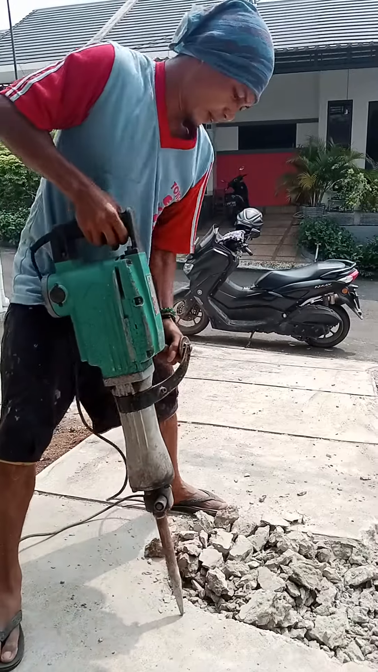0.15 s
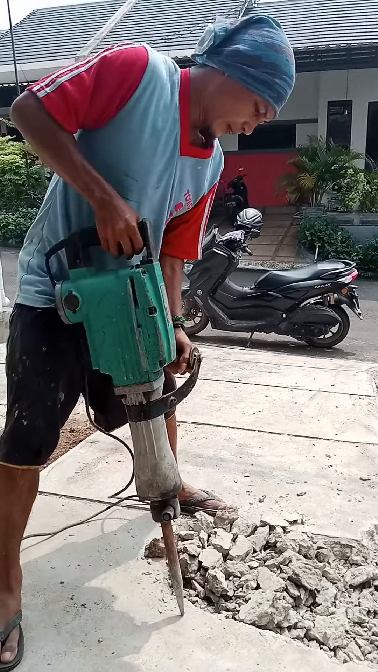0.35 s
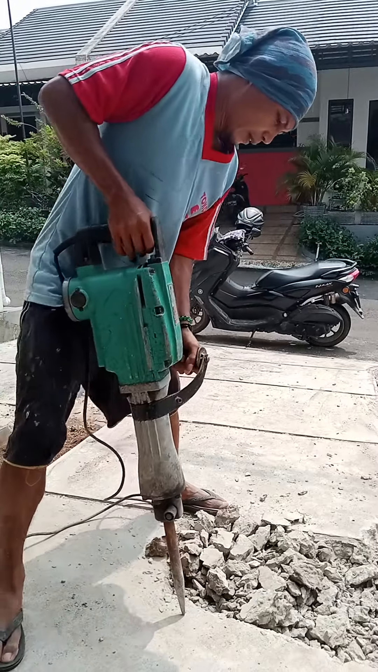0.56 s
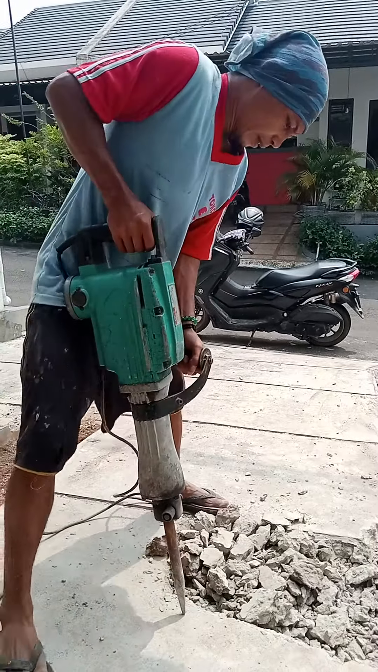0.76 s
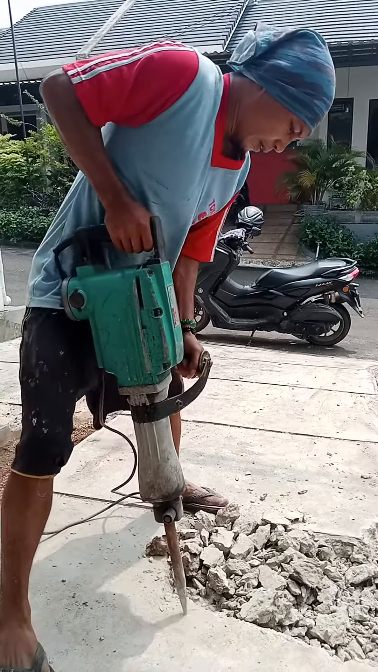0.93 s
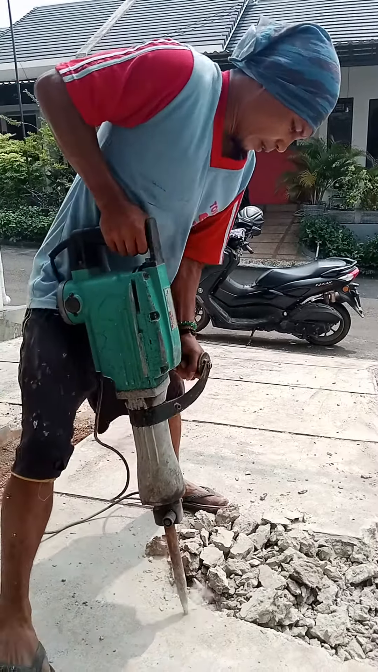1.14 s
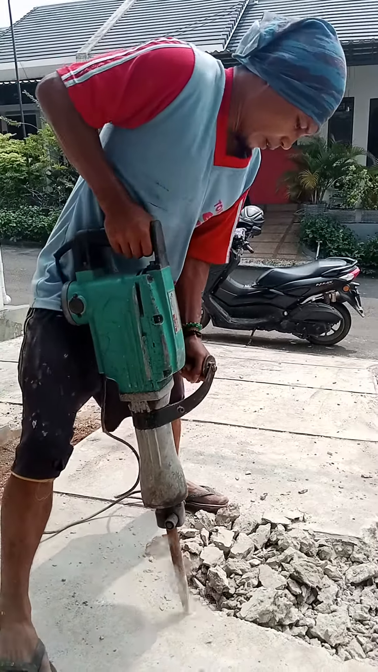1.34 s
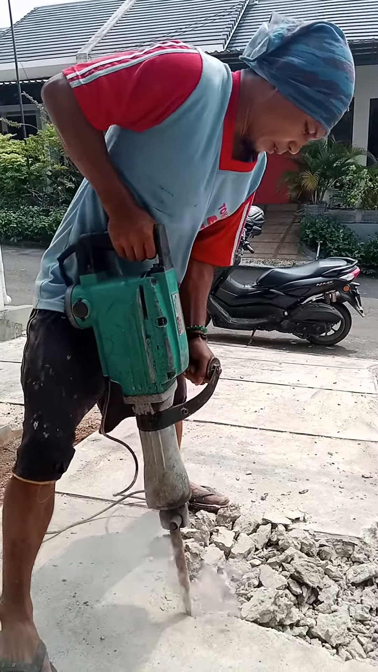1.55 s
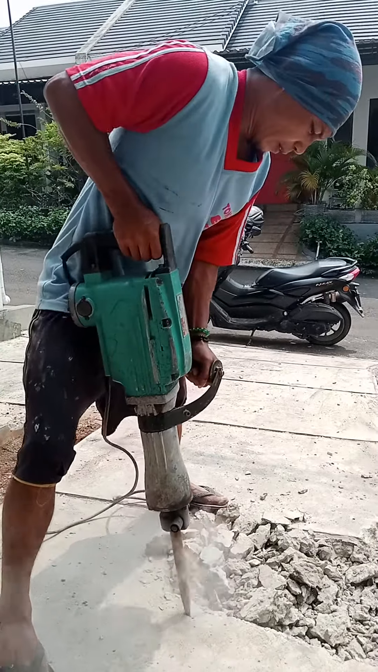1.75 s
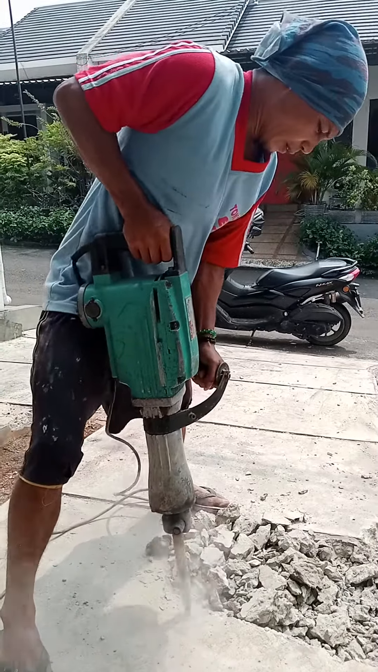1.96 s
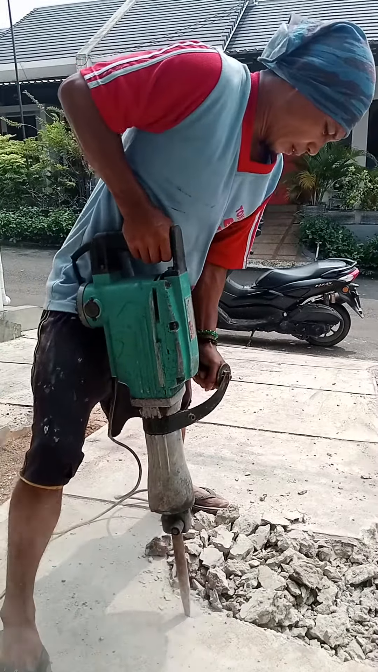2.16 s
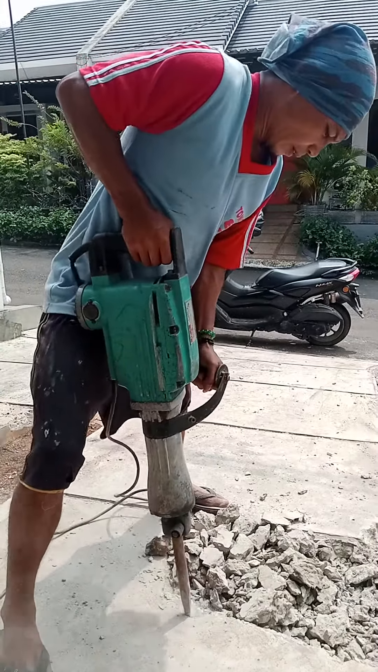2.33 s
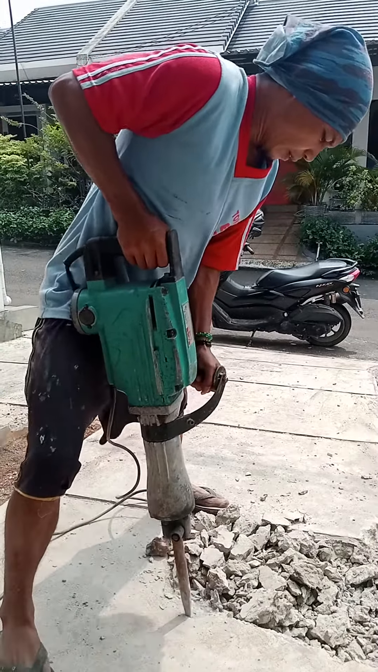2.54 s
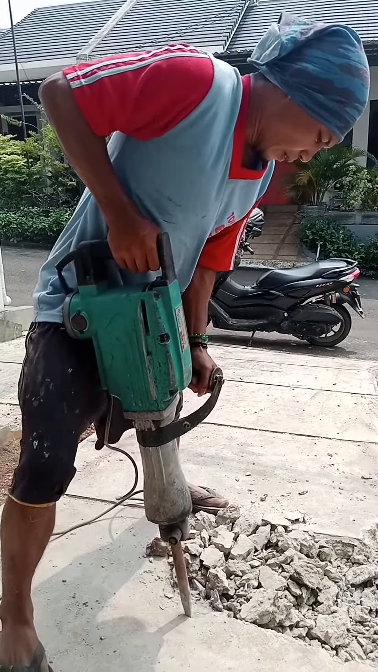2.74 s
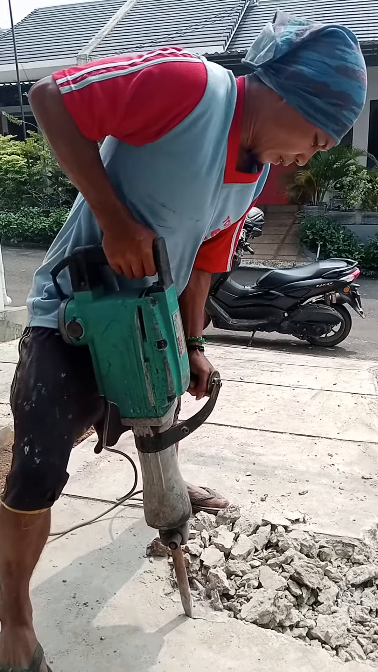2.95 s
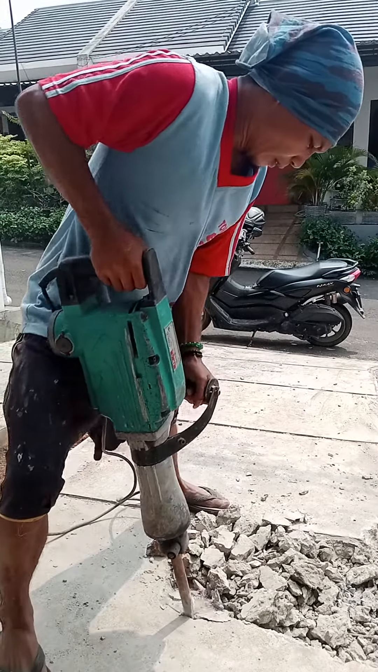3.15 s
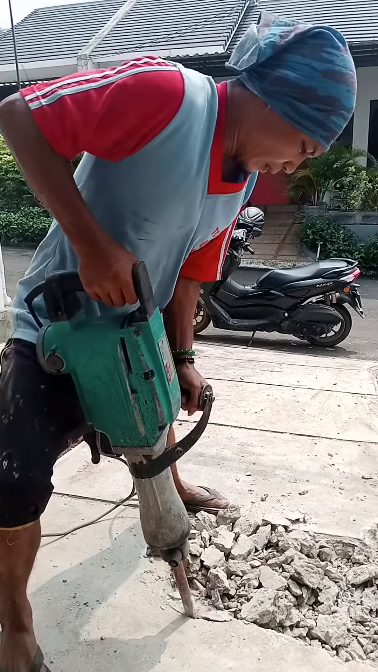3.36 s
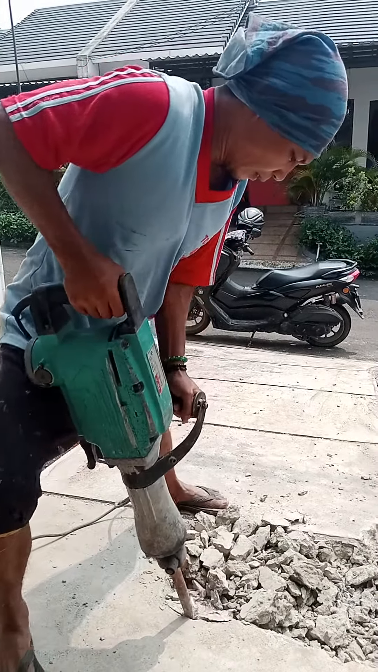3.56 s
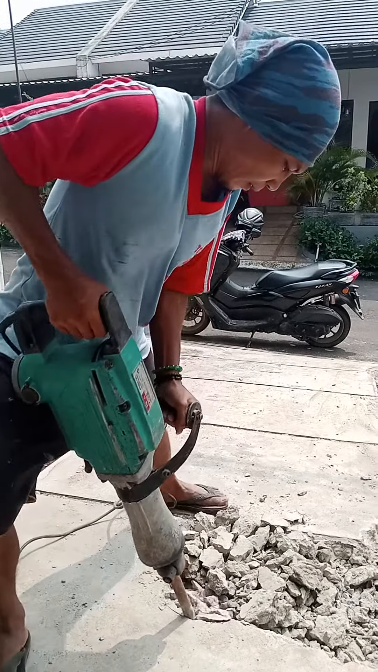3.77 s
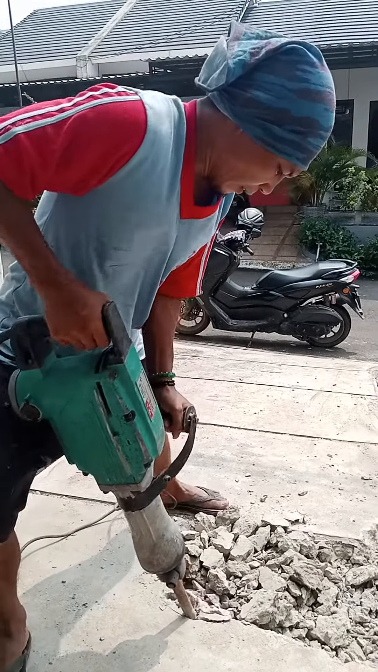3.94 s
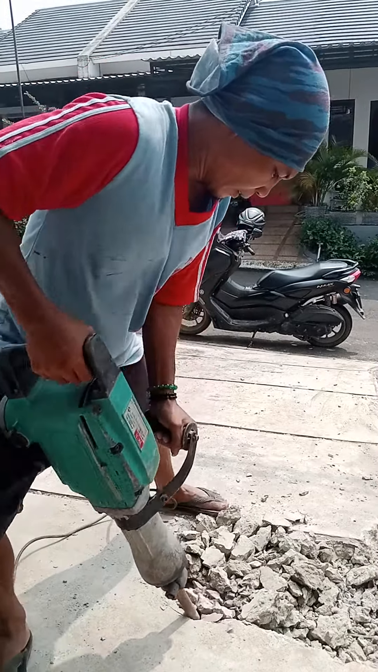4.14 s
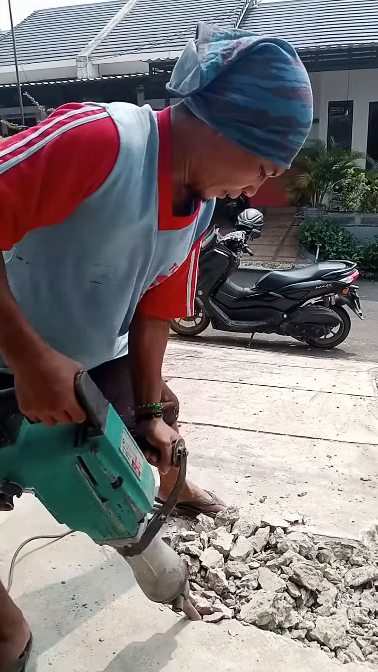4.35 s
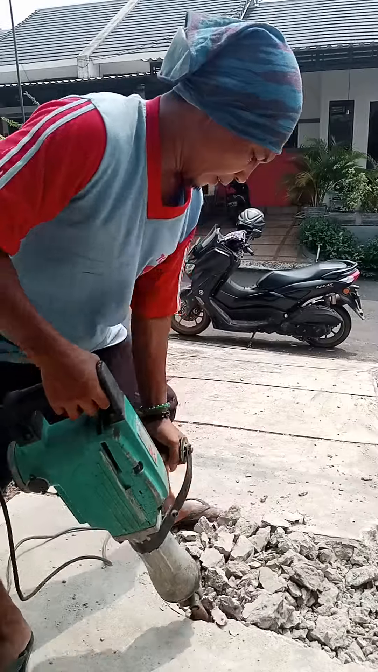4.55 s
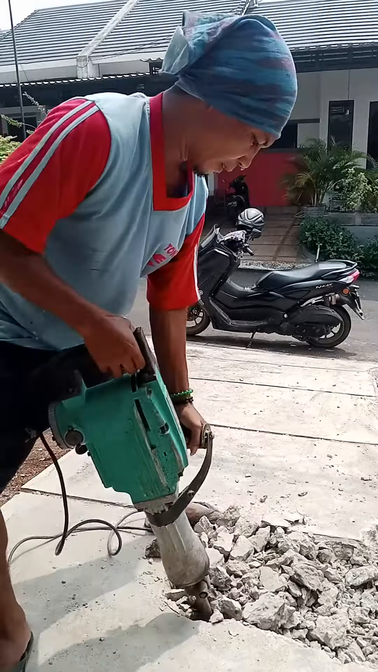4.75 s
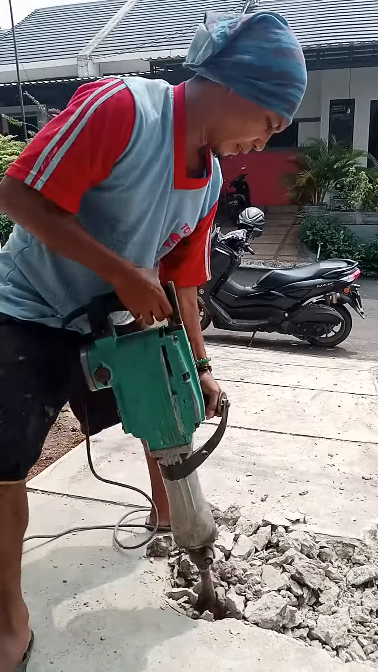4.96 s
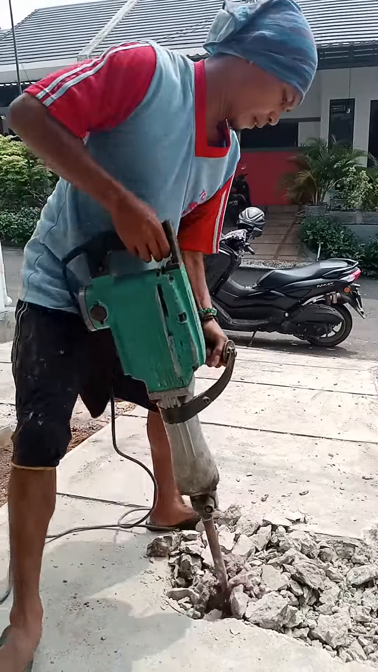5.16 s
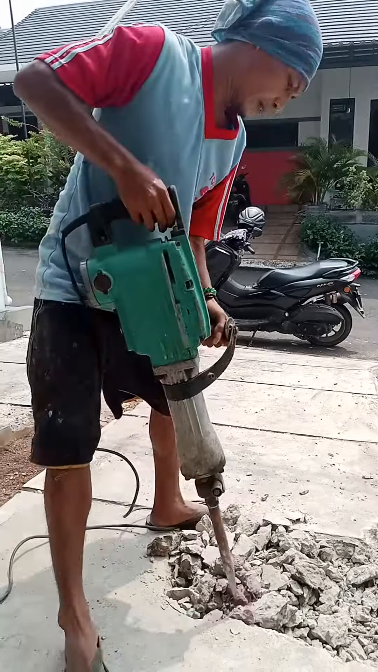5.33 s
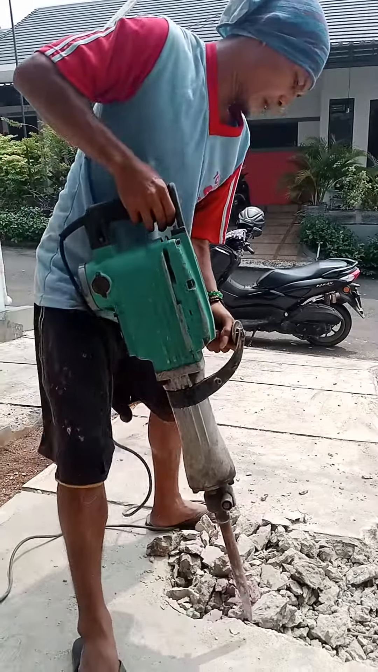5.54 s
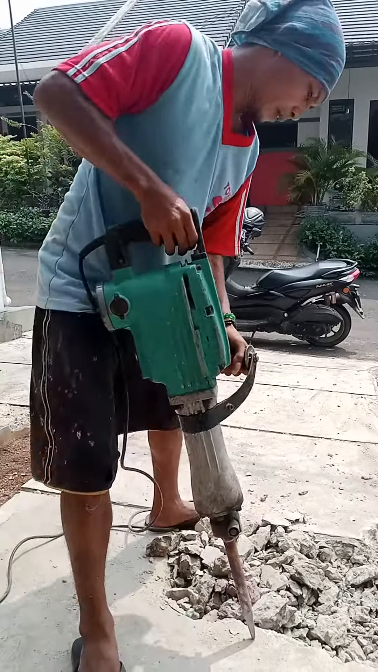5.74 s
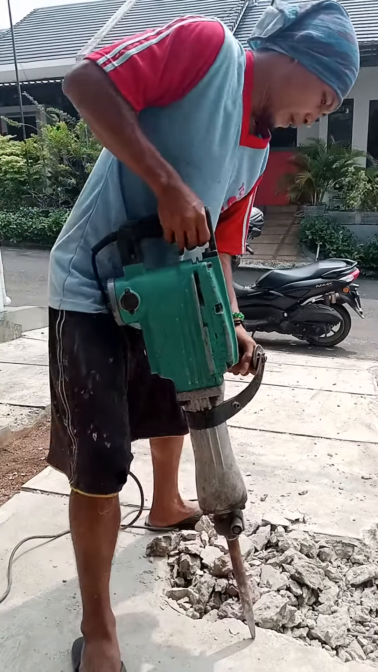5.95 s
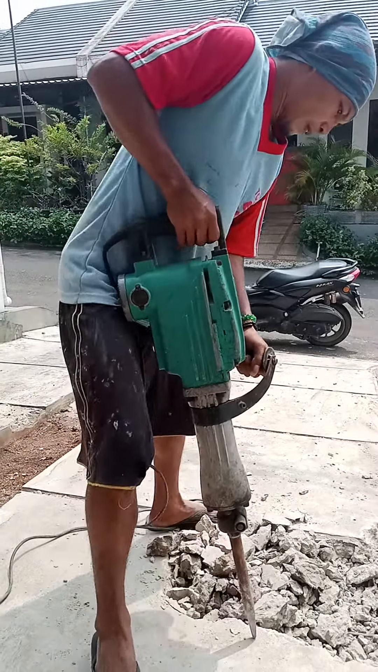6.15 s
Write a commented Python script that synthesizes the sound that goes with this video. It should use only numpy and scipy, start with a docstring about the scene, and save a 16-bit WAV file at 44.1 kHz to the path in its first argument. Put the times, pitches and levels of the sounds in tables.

```python
"""An electric demolition hammer pounds a concrete slab about 23 times a second, outdoors near a phone.
It is set down first, and afterwards levered out and set down again. Each blow is a blunt knock with slab modes,
a noise burst of cracking grit and dying steel modes of the chisel, choked when the tip presses on concrete again.
Between blows run coloured noise (rattle, hiss, rumble) and fuzzy gear and armature whines; drops of the tool
make the slab boom, fuzzy tones sing in the handled tool, and sparse echoes answer the blows."""
import sys
import numpy as np
from scipy import signal
from scipy.fft import rfft, irfft
from scipy.io import wavfile
from scipy.ndimage import uniform_filter1d

SR = 44100
rng = np.random.default_rng(int(sys.argv[2]) if len(sys.argv) > 2 else 0)


def bounce(signal):
    """Save signal as a 16-bit WAV file at the path given by the first command-line argument."""
    frames = np.transpose(np.atleast_2d(signal))
    limited = np.clip(frames, -1, 1)
    pcm = np.round(limited * 32767).astype(np.int16)
    wavfile.write(sys.argv[1], SR, pcm)


def elevation(decibels):
    """Turn decibel levels (scalar or array-like) into linear amplitude ratios."""
    levels = np.asarray(decibels, float)
    return 10 ** (levels / 20)


N = 277830

SHANK_HZ = 12500
RING_DB = -14.5  # chisel ring of a bare tip, before the trim in chisel()

# Work of the hammer: (time [s], knock pitch [Hz], tip depth [0-1], knock level [dB], motor effort [dB], load [0-1])
WORK_POINTS = [(0.751, 650, 0.37, -13, 3.5, 0.4), (1.102, 673, 0.18, -6.5, 0, 0.79),
               (1.603, 780, 0.02, -6, 2.5, 0.5), (2, 810, 0.03, -4, 3.5, 0.69),
               (2.65, 763, 0.31, -3, -1, 1), (2.85, 685, 0.63, -6.5, -0.5, 1),
               (3.08, 640, 0.46, -8.5, 1, 0.85), (3.199, 640, 0.29, -13, 3, 0.68),
               (3.598, 644, 0.34, -13, 2, 0.73), (4.15, 550, 0.41, -21.5, 6, 0.49),
               (4.35, 547, 0, -56, 4, 0), (4.5, 676, 0.12, -16, -1.5, 0.19), (4.9, 663, 0.3, -46, -5, 0.26)]
# Piston speed from run-up to run-down: (time [s], rate [blows per s])
PISTON_SPEED = [(.87, 17.05), (1.08, 22.49), (1.37, 21.78), (1.56, 23.46), (1.69, 22.45), (2.56, 22.92),
                (2.85, 23.87), (2.94, 24.91), (3.31, 25.75), (3.7, 25.17), (4.19, 26.97), (4.26, 24.27),
                (4.37, 25.98), (4.6, 14.92), (4.9, 6.8)]
# Tool's weight dropping on the slab: (time [s], boom level [dB], housing clank level [dB])
TOOL_DROPS = [(0.154, -27.5, -37), (0.247, -20.5, -29), (0.3337, -12, -26), (0.424, -21, -21),
              (0.519, -17, -28), (0.787, -23, -18), (5.736, -21.5, -33), (5.764, -20, -13),
              (6.29, -11.5, -15.5)]
# Ringing modes of the tool housing: (frequency [Hz], level [dB], t60 [s])
HOUSING_MODES = [(1173, -11, 0.21), (2300, -30.5, 0.21), (2840, -12, 0.053), (3170, -16.5, 0.2),
                 (3560, -29.5, .22), (4900, -28, 0.33), (5260, -11.5, 0.15)]


def read(points, hz):
    """Value of a spectrum on a log-frequency axis."""
    f, value = np.transpose(points)
    return np.interp(np.log(hz + 1), np.log(f + 1), value)


def evened(x):
    """Scales to rms 1."""
    return x / np.sqrt(np.mean(x ** 2) + 1e-20)


def smooth_noise(size):
    """Slow random curve of rms 1: a moving average of white noise."""
    return evened(uniform_filter1d(rng.standard_normal(N), size))


def smooth_patches(shape, bins, frames):
    """Random time-frequency patches of rms 1."""
    across = uniform_filter1d(rng.standard_normal(shape), bins, axis=0)
    return evened(uniform_filter1d(across, frames, axis=1))


def coloured(x, points):
    """Gives x the colour of a spectrum."""
    gain = elevation(read(points, np.fft.rfftfreq(len(x), 1 / SR)))
    return irfft(rfft(x) * gain, len(x))


def ring(modes, t, phase_turns):
    """Sum of dying sines."""
    hz, db, t60_s = np.transpose(modes)[:, :, None]
    sines = np.sin(2 * np.pi * (hz * t + phase_turns))
    return (elevation(db - 60 * t / t60_s) * sines).sum(0)


def whine(hz, width_hz):
    """A fuzzy whistle of rms 1: slow noise shifted up to a moving pitch."""
    r = np.exp(-np.pi * width_hz / SR)
    noise = rng.standard_normal(N) + 1j * rng.standard_normal(N)
    slow = signal.lfilter([1], [1, -2 * r, r * r], noise)
    carrier = np.exp(2j * np.pi * np.cumsum(hz) / SR)
    return evened((slow * carrier).real)


def patchy(points, patchy_db, grain_db):
    """Grainy noise of rms 1 whose colour flickers in small patches."""
    grain_gain = elevation(grain_db * np.minimum(rng.exponential(1, N), 4))
    grains = grain_gain * rng.standard_normal(N)
    z = signal.stft(coloured(grains, points), nperseg=256)[2]
    patches = smooth_patches(z.shape, 4, 8)
    flicker = evened(uniform_filter1d(rng.standard_normal(z.shape[1]), 5))
    z = z * elevation(patchy_db * patches + 1.7 * flicker)
    return evened(signal.istft(z, nperseg=256)[1][:N])


def train(blows, gain, lead_s=0):
    """One click at every blow, lead_s ahead of it."""
    clicks = np.zeros(N)
    clicks[np.round((blows[:, 0] - lead_s) * SR).astype(int)] = gain
    return clicks


def swell(start_s, length_s, rise_s, fade_db_per_s):
    """Rises, holds and fades."""
    t = np.arange(N) / SR - start_s
    return np.clip(t / rise_s, 0, 1) * elevation(-fade_db_per_s * np.maximum(t - length_s, 0))


def all_blows():
    """Piston blows on whole turns, weaker for a buried tip, merged with bumps: rows (s, crack, knock, ring dB)."""
    # Tip bumping concrete or rubble in handling: (time [s], crack level [dB], knock level [dB], ring level [dB])
    bumps = [(0.012, -19.5, -53, -52), (0.157, -52, -15, -61), (0.1914, -41, -29, -50),
             (0.222, -18, -40, -62), (0.2483, -16, -10, -14.5), (0.335, -21.5, -16, -38),
             (0.4271, -15.5, -11.5, -30), (0.441, -15, -12.5, -40), (0.482, -23, -25, -53),
             (0.525, -22.5, -25, -64), (0.533, -43, -48, -64), (0.608, -33.5, -42, -64),
             (.658, -44, -54, -64), (0.768, -12, -26, -51), (0.789, -17, -10, -38), (0.821, -16, -25, -52),
             (4.5858, -14.5, -48, -45), (4.6565, -16.5, -22.5, -36), (4.799, -28, -32, -38),
             (4.9498, -14.5, -35, -50), (4.974, -29, -47, -51), (4.993, -17, -46, -56),
             (5.0284, -14.5, -33, -52), (5.06, -43, -46, -58), (5.182, -29, -28, -63),
             (5.336, -39, -53, -44), (5.695, -53, -77, -68), (5.7183, -34, -53, -63),
             (5.7425, -32, -12, -35), (5.765, -20, -19, -42), (5.822, -32, -47, -63),
             (5.838, -44, -53, -64), (6.121, -54, -74, -53), (6.155, -53, -63, -64),
             (6.206, -15.5, -44, -58), (6.235, -14.5, -30, -56), (6.273, -25, -38, -55),
             (6.2915, -17, -20, -46)]
    # Blows that stand out: (time [s], crack level [dB], ring level [dB])
    marked = [(.87, -7, -33.5), (.93, -15.5, -11.5), (1.03, -13, -17), (1.07, -10, -16.5), (1.12, -7, -13),
              (1.21, -5, -14), (1.3, -4.5, -14), (1.34, -12, -14), (1.48, -16, -11.5), (1.57, -4, -13),
              (1.61, -9, -11), (1.65, -6.5, -9.5), (1.7, -5.5, -14.5), (1.83, -6.5, -14),
              (1.875, -3.5, -38.5), (1.92, -3, -14), (2.01, -2, -11), (2.23, -7.5, -13.5),
              (2.36, -6, -19.5), (2.58, -9, -21), (4.4, -6, -23), (4.445, -4.5, -40), (4.545, -6, -43),
              (4.765, -15, -20.5), (4.88, -12, -39)]
    # The slab gives way: start and end [s]
    broken_s = (2.9, 3.3)
    crack_db, crack_buried_db, crack_spread_db = -6.5, -13, -0.5  # bare tip, change when buried, chance
    ring_buried_db, ring_spread_db = -37, 3
    ring_broken_db, ring_unloaded_db = -12, -6  # rubble damps the chisel
    knock_spread_db, loose_spread_db = 0.8, 2.5  # chance on firm concrete, added once broken
    jitter_s = 0.0003

    t = np.arange(PISTON_SPEED[0][0], PISTON_SPEED[-1][0], 1 / SR)
    turns = np.cumsum(np.interp(t, *np.transpose(PISTON_SPEED))) / SR
    s = np.interp(np.arange(int(turns[-1]) + 1), turns, t)
    late, hard, firm, free = rng.standard_normal((len(s), 4)).T
    at, _, depth, knock_db, _, load = np.transpose(WORK_POINTS)
    buried = np.clip(np.interp(s, at, depth), 0, 1)
    broken = np.interp(s, broken_s, (0, 1))
    unloaded = 1 - np.interp(s, at, load)

    cracks_db = crack_db + crack_buried_db * buried + crack_spread_db * hard
    spread_db = knock_spread_db + loose_spread_db * broken
    knocks_db = np.interp(s, at, knock_db) + spread_db * np.clip(firm, -2, 1)
    rings_db = RING_DB + ring_buried_db * buried + ring_spread_db * free
    rings_db = rings_db + ring_broken_db * broken + ring_unloaded_db * unloaded ** 2
    rows = np.transpose([s + jitter_s * late, cracks_db, knocks_db, rings_db])
    for marked_s, *levels_db in marked:
        rows[np.argmin(abs(s - marked_s)), 1::2] = levels_db
    rows = np.vstack([rows, bumps])
    return rows[np.argsort(rows[:, 0])]


def loudness():
    """Gains of rattle, hiss and rumble: the motor, the scrapes and the drops add up in power."""
    # Floor that never stops: rattle, hiss, rumble levels [dB]
    still_db = [-81, -79.5, -66.5]
    # Tool dragged or levered through grit:
    # (start [s], rise [s], length from start to fade [s], housing rattle level [dB], grit hiss level [dB])
    scrapes = [(-.03, 0.068, 0.054, -28.5, -31.5), (0.056, 0.0052, 0.084, -29, -31),
               (0.168, 0.0071, 0.035, -30, -32.5), (0.28, 0.0072, 0.11, -33.5, -36.5),
               (0.425, 0.0057, 0.1, -33.5, -41), (0.553, 0.0043, 0.089, -47.5, -51),
               (0.675, 0.0046, 0.045, -42, -41.5), (4.637, .015, 0.12, -36, -34),
               (4.796, 0.0098, 0.051, -31, -34), (4.901, 0.04, 0.18, -32.5, -36),
               (5.093, 0.036, 0.045, -31, -32), (5.173, 0.004, 0.12, -38, -42.5),
               (5.332, .005, 0.049, -37, -37), (5.537, 0.15, 0.37, -62, -62.5),
               (5.759, 0.0037, 0.014, -32, -39), (6.044, 0.17, .14, -64, -64),
               (6.143, 0.039, .06, -47.5, -45.5), (6.181, 0.099, 0.13, -25.5, -28.5)]
    start_s, run_up_s, full_blows_per_s = 0.75, 0.035, 24
    rattle_motor_db, hiss_motor_db, rumble_motor_db = -34.5, -32.5, -28  # at full speed and 0 dB effort
    rumble_unloaded_db = -15.5
    fade_db_per_s = 277  # motor and scrapes

    t = np.arange(N) / SR
    at, *_, effort_db, load = np.transpose(WORK_POINTS)
    speed = np.interp(t, *np.transpose(PISTON_SPEED)) / full_blows_per_s
    motor = swell(start_s, PISTON_SPEED[-1][0] - start_s, run_up_s, fade_db_per_s)
    motor = motor * speed ** 0.23 * elevation(np.interp(t, at, effort_db))
    rumble_db = rumble_motor_db + rumble_unloaded_db * (1 - np.interp(t, at, load))
    motor_db = np.array([rattle_motor_db + 0 * t, hiss_motor_db + 0 * t, rumble_db])
    power = elevation(np.array(still_db))[:, None] ** 2 + (motor * elevation(motor_db)) ** 2
    for scrape_s, rise_s, length_s, rattle_db, hiss_db in scrapes:
        shares = elevation(np.array([rattle_db, hiss_db, rattle_db - 22]))
        power += np.outer(shares, swell(scrape_s, length_s, rise_s, fade_db_per_s)) ** 2
    for drop_s, boom_db, _ in TOOL_DROPS:  # the ground shivers on
        shiver = swell(drop_s, 0, rise_s=0.024, fade_db_per_s=133.5)
        power[2] += (elevation(boom_db - 12.5) * shiver) ** 2
    return np.sqrt(power)


def running(rattle, hiss, rumble):
    """Rattle and hiss over a lumpy rumble; gear and armature whines follow the motor speed and load."""
    # Relative spectra: (frequency [Hz], density [dB per Hz])
    rattle_spectrum = [(250, -7), (450, -5.5), (650, 3), (950, -8.5), (1350, -6.5), (1650, 1.5), (2100, 1),
                       (2800, -3), (3600, -0.5), (4600, -7.5), (8000, -48.5)]
    hiss_spectrum = [(2500, -30.5), (4200, -13.5), (5020, -4), (6710, -5.5), (8000, -15.5), (8900, -14.5),
                     (10400, -21.5), (14900, -28), (16200, -51)]
    rumble_spectrum = [(30, -43.5), (65, -7.5), (120, -2), (155, 6), (210, -6), (280, -1), (380, -6),
                       (900, -88)]
    # Gear mesh, its overtone, armature: (multiple of blow rate, width [Hz], level [dB])
    whines = [(76, 200, -3.5), (148, 250, 2), (258, 550, -2.5)]

    t = np.arange(N) / SR
    at, _, depth, *_, load = np.transpose(WORK_POINTS)
    blows_per_s = np.interp(t, *np.transpose(PISTON_SPEED))
    share = np.clip(np.interp(t, at, load), 0, 1)
    buried = np.clip(np.interp(t, at, depth), 0, 1)
    gears, overtone, armature = (share * elevation(db) * whine(order * blows_per_s, width_hz)
                                 for order, width_hz, db in whines)

    grit = patchy(hiss_spectrum, patchy_db=-1.5, grain_db=8.0)
    # scraping sings in the metal, now and then
    steel = evened(signal.oaconvolve(grit, ring(HOUSING_MODES[1:], t[:400], 0))[:N])
    steel = steel * elevation(3.5 * smooth_noise(2500))
    housing = patchy(rattle_spectrum, patchy_db=2.5, grain_db=3.0)
    ground = evened(coloured(rng.standard_normal(N), rumble_spectrum))

    rattling = rattle * (housing + gears + overtone * buried)
    hissing = hiss * (grit + elevation(-13.5) * (1.2 - share) * steel + armature)
    return rattling + hissing + elevation(-0.5) * rumble * ground


def yard_hum():
    """Steady low hum nearby: narrow fuzzy tones."""
    # (frequency [Hz], level [dB])
    hums = [(150, -54), (192, -56), (234, -61)]
    return sum(elevation(db) * whine(np.full(N, hz), width_hz=28) for hz, db in hums)


def slab(blows, lead_s=0.002656, rubble_db=-19, rubble_t60_s=0.15):
    """A blunt knock rings the slab and shakes rubble; a buried tip knocks later, longer, duller."""
    # Slab modes: (frequency [Hz], level [dB], t60 [s])
    slab_modes = [(273.6, -23.5, 0.15), (428, -18.5, 0.085), (690, -11.5, 0.03), (758, -25, 0.21),
                  (850, -33, 0.027), (1030, -26.5, 0.2), (1262, -25, 0.13), (1430, -21, 0.049),
                  (1700, -18.5, 0.076)]
    # Knock coming back from slab edges and tool body: (delay [s], gain [ratio, negative = turned over])
    returns = [(.003, .38), (.0125, -.22), (.0143, .15), (.0192, -.16), (.025, -.16)]
    edge_share, edge_pitch = 0.4, 1.85  # sharper edge of a bare tip; pitch as multiple of the knock's
    bed_turns_per_s, loose_db = 0.9, -3

    out, t = np.zeros(N + 6000), np.arange(6000) / SR
    s, _, knock_db, _ = blows.T
    at, pitch_hz, depth, *_ = np.transpose(WORK_POINTS)
    chance = rng.standard_normal((len(blows), len(slab_modes)))
    # the bed answers alike from blow to blow
    beds = [whine(np.full(N, 950.), width_hz=1700)[k * 9000:][:len(t)] for k in (1, 2)]
    loose = np.resize(whine(np.full(N, 1000.), width_hz=1100), len(out))
    depth = np.clip(np.interp(s, at, depth), 0, 1)
    for start_s, db, hz, buried, strength in zip(s, knock_db, np.interp(s, at, pitch_hz), depth, chance):
        first = round((start_s - lead_s) * SR)
        turns = hz * t - 1 - 0.8 * buried
        cycles = np.where(turns < 0, 0.55 + 0.4 * buried, 0.52 + 1.5 * buried)
        edge = edge_share * (1 - buried) ** 2 * np.cos(2 * np.pi * edge_pitch * turns)
        blunt = -(np.cos(2 * np.pi * turns) + edge) * np.exp(-(turns / cycles) ** 2)
        echoes = sum(gain * np.roll(blunt, round(delay_s * SR)) for delay_s, gain in returns)
        back = (1 - buried) * echoes

        settle = 2 * np.pi * bed_turns_per_s * start_s  # the bed changes slowly as the hole grows
        bed = np.cos(settle) * beds[0] + np.sin(settle) * beds[1]
        rubble = bed + elevation(loose_db) * loose[first:][:len(t)]
        rubble_gain = elevation(rubble_db - 14.0 * buried - 60 * t / rubble_t60_s)
        modes = np.array(slab_modes, float)
        modes[:, 0] *= 1 + 0.005 * strength[::-1]  # the tip never lands on quite the same spot
        octaves_up = np.log2(np.maximum(modes[:, 0] / 800, 1))
        modes[:, 1] += 1.5 * strength - 14 * buried * octaves_up
        shake = ring(modes, t, 0) + rubble_gain * rubble
        onset = 1 - np.exp(-(t / 0.0021) ** 2)
        out[first:][:len(t)] += elevation(db + 0.5) * (blunt + back + shake * onset)
    return out[:N]


def crack(blows, snap_s=0.0025, burst_s=0.0057, tail_db=-15, tail_t60_s=0.096):
    """Concrete splinters in a burst of a few ms, shorter off load, then chips and dust trickle after."""
    # Relative spectrum of splintering: (frequency [Hz], level [dB])
    crack_spectrum = [(500, -7.5), (1500, -6), (4300, -4), (5200, 4), (6500, 0.5), (8200, 0), (10500, -20),
                      (15000, -13.5), (16200, -29.5)]
    soft_tilt_db_per_octave, soft_from_db = -7, -11.5  # gentle blows are duller; full tilt 15 dB lower

    t = np.arange(8000) / SR
    at, *_, load = np.transpose(WORK_POINTS)
    load = np.clip(np.interp(np.arange(N) / SR, at, load), 0, 1)
    clicks = train(blows, elevation(blows[:, 1]), lead_s=0.0011)
    attack = 1 - np.exp(-t / 0.00022)
    tail = elevation(tail_db - 60 * t / tail_t60_s)
    envelope = np.zeros(N)
    for share, length_s in ((load, burst_s), (1 - load, snap_s)):
        shape = attack * (np.exp(-(t / length_s) ** 3.1) + tail)
        envelope += signal.oaconvolve(clicks * share, shape)[:N]

    z = signal.stft(coloured(rng.standard_normal(N), crack_spectrum), nperseg=128)[2]
    tint = smooth_patches(z.shape, 4, 5)  # no two chips alike
    octaves = np.log2(np.clip(np.fft.rfftfreq(128, 1 / SR), 2000, 14000) / 6000)[:, None]
    level_db = np.interp(np.arange(z.shape[1]) * 64 / SR, blows[:, 0], blows[:, 1])
    softness = np.clip((soft_from_db - level_db) / 15, 0, 1)
    z = z * elevation(2.6 * tint + soft_tilt_db_per_octave * octaves * softness)
    grit = evened(signal.istft(z, nperseg=128)[1][:N])
    return elevation(0.5) * grit * envelope


def chisel(blows, spread_db=3.5, choke_s=0.005):
    """Steel modes, struck a little differently each time, choked when the tip lands again before the next blow."""
    # Chisel modes: (frequency [Hz], level [dB], t60 [s])
    chisel_modes = [(4920, -12, 0.071), (4940, -11.5, 0.089), (5470, -23.5, 0.034), (7040, -2, 0.061),
                    (7170, 1.5, 0.052), (7900, -15, 0.35), (9950, -8, 0.053), (12300, -33.5, 0.1),
                    (13390, -32, .2)]

    out, t = np.zeros(N + 5000), np.arange(5000) / SR
    chance = rng.standard_normal((len(blows), 3, len(chisel_modes)))
    s, *_, ring_db = blows.T
    free_s = np.diff(s, append=N / SR) * rng.uniform(0.45, 0.8, len(s))
    onset = 1 - np.exp(-t / 0.0017)
    for start_s, db, free, (strength, detune, phase) in zip(s, ring_db, free_s, chance):
        modes = np.array(chisel_modes, float)
        modes[:, 0] *= 1 + 0.003 * detune
        modes[:, 1] += spread_db * strength + db + 6.0
        choke = np.exp(-np.maximum(t - free, 0) / choke_s)
        out[round(start_s * SR):][:len(t)] += choke * onset * ring(modes, t, phase[:, None])

    # the shank pings in its holder just before the next blow, and chatters there
    freed_db = np.minimum(ring_db[:-1] - RING_DB, 0) + 6 * rng.standard_normal(len(s) - 1)
    pings = train(blows[1:], elevation(-35.5 + freed_db), lead_s=0.008)
    out[:N] += signal.oaconvolve(pings, ring([(SHANK_HZ, 0, 0.03)], t[:1500], 0))[:N]
    return out[:N] * (1 + 0.45 * smooth_noise(120))


def singing(sharpness=50, flutter_db=2.5):
    """Fuzzy, fluttering, gliding tones in the tool while lifted, pushed or levered; each swells early and fades."""
    # (start [s], end [s], first pitch [Hz], last pitch [Hz], level [dB])
    tones = [(0.014, 0.07, 677, 596, -32), (0.058, 0.14, 670, 630, -32.5),
             (0.293, .33, SHANK_HZ, SHANK_HZ, -38), (4.505, 4.55, SHANK_HZ, SHANK_HZ, -41),
             (4.59, 4.615, SHANK_HZ, SHANK_HZ, -42), (4.66, 4.682, SHANK_HZ, SHANK_HZ, -35),
             (4.7, 4.88, SHANK_HZ, SHANK_HZ, -41), (5.087, 5.144, 690, 550, -33.5),
             (5.163, 5.412, 683, 672, -49), (5.405, 5.607, 830, 815, -66), (5.524, 5.72, 5100, 5070, -73),
             (5.566, 5.765, 690, 664, -55.5), (5.629, 5.73, 2040, 1620, -62), (6.203, 6.325, 632, 658, -37)]
    out = np.zeros(N)
    for start_s, end_s, first_hz, last_hz, db in tones:
        part = np.clip((np.arange(N) / SR - start_s) / (end_s - start_s), 0, 1)
        flutter = elevation(flutter_db * smooth_noise(900))
        glide_hz = first_hz + (last_hz - first_hz) * part
        sung = whine(glide_hz, width_hz=8 + min(first_hz / sharpness, 110))
        out += elevation(db) * np.sin(np.pi * part ** 0.7) ** 0.7 * flutter * sung
    return out


def yard(x, t60_s=0.36, first_s=0.006):
    """Sparse echoes of random sign from walls and paving, the same for every blow."""
    at = np.arange(round(first_s * SR), 9000, 20)
    taps = np.zeros(9020)
    signs = rng.choice([-1., 1.], len(at))
    taps[at + rng.integers(0, 20, len(at))] = signs * elevation(-60 * at / SR / t60_s)
    return signal.oaconvolve(x, taps / np.linalg.norm(taps))[:N]


def thuds(blows, rumble, over_db=7.0, rock_db=-1.0):
    """The loose slab booms at each drop of the tool, and at each blow as strongly as the ground rumbles."""
    # Loose slab bouncing on its bed: (frequency [Hz], level [dB], t60 [s])
    thud_modes = [(150.7, -6, 0.19), (216.5, 14.5, 0.027)]
    # Whole slab rocking: (frequency [Hz], level [dB], t60 [s])
    rock_modes = [(155.2, -7, 0.26), (207.6, -6.5, 0.12), (275, -7, 0.13)]

    t = np.arange(16000) / SR
    chance_db = 1.9 * rng.standard_normal(len(blows))
    strength = rumble[(blows[:, 0] * SR).astype(int)] * elevation(over_db + chance_db)
    kicks = train(blows, strength, lead_s=-0.0016)
    drops, clanks = (train(np.array(TOOL_DROPS), elevation(db)) for db in np.transpose(TOOL_DROPS)[1:])
    # a short slab moves no deep bass
    firm = signal.sosfilt(signal.butter(2, 90, "high", fs=SR, output="sos"), drops)
    thud = ring(thud_modes, t, 0) * (1 - np.exp(-t / 0.0026))
    rock = ring(rock_modes, t, 0) * (1 - np.exp(-t / 0.01))
    boom = signal.oaconvolve(kicks + firm, thud)
    rocking = signal.oaconvolve(firm + elevation(rock_db) * kicks, rock)
    buzz = 1 + 0.54 * smooth_noise(150)  # loose parts
    clanking = buzz * signal.oaconvolve(clanks, ring(HOUSING_MODES, t, 0))[:N]
    return (boom + rocking)[:N] + clanking


def dim_faint_treble(x):
    """Turns down very faint treble, bin by bin, by its smoothed level."""
    gate_db, depth_db, from_hz = -95.5, -21.5, 8850
    hz, _, z = signal.stft(x, SR, nperseg=512)
    power = uniform_filter1d(uniform_filter1d(abs(z) ** 2, size=15, axis=-2), size=3, axis=-1)
    level_db = 10 * np.log10(abs(power) + 1e-16)
    faint = 1 / (1 + np.exp((level_db - gate_db) / 2))
    treble = 1 / (1 + (from_hz / (hz[:, None] + 1)) ** 10)
    return signal.istft(z * elevation(depth_db * faint * treble), SR, nperseg=512)[1][..., :N]


def scene():
    """Blows with their echoes over the running tool, its singing and the hum."""
    blows, gains = all_blows(), loudness()
    low = slab(blows)
    high = crack(blows) + chisel(blows)
    echoes = yard(elevation(-9.5) * low + elevation(-13.5) * high)
    struck = low + high + thuds(blows, gains[2]) + echoes
    return (struck + running(*gains) + singing() + yard_hum())[None]


def band_limit(x):
    """A steep low-pass at the top of the band."""
    return signal.sosfilt(signal.butter(12, 16990, fs=SR, output="sos"), x)


def record(dry):
    """Dims faint treble, then a low cut, soft overload and a 16 kHz treble limit."""
    thin = signal.sosfilt(signal.butter(3, 60, "high", fs=SR, output="sos"), dim_faint_treble(dry))
    squeezed = 0.6 * np.tanh(thin / 0.81)
    lowpass = signal.firwin(255, 16250, window=("kaiser", 6), fs=SR)
    mix = signal.oaconvolve(squeezed, lowpass[None], "same")
    return band_limit(mix)


dry = scene()
out = record(dry)
bounce(out)
```